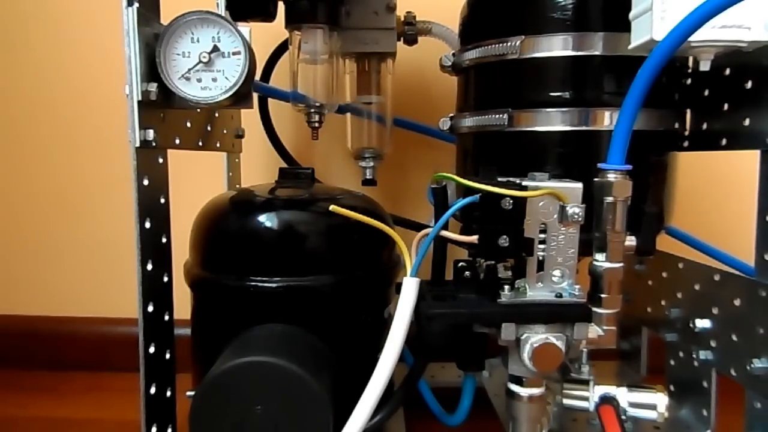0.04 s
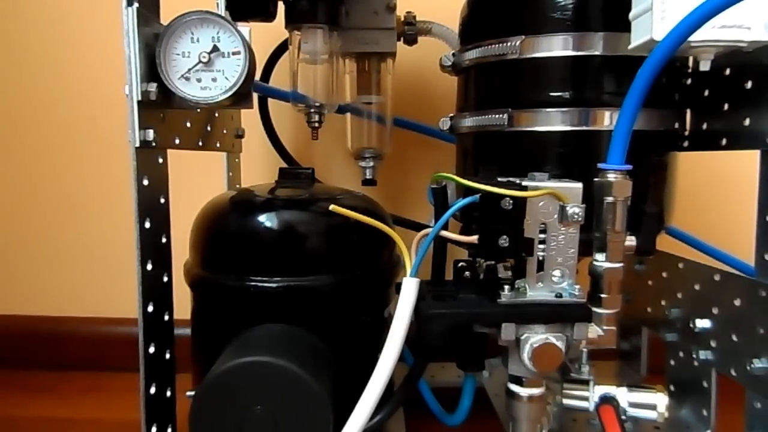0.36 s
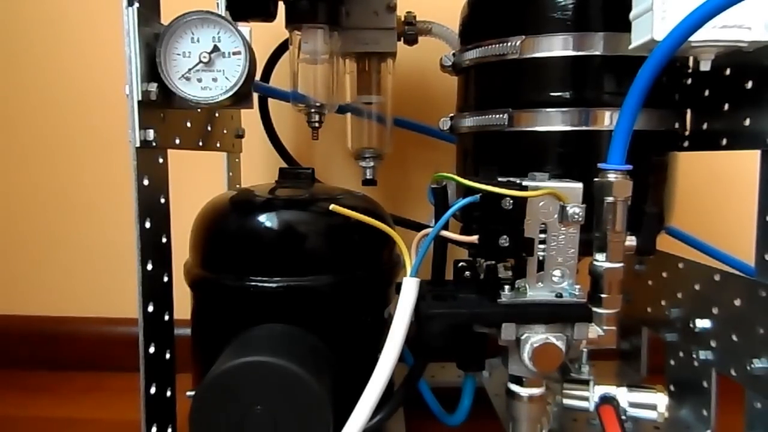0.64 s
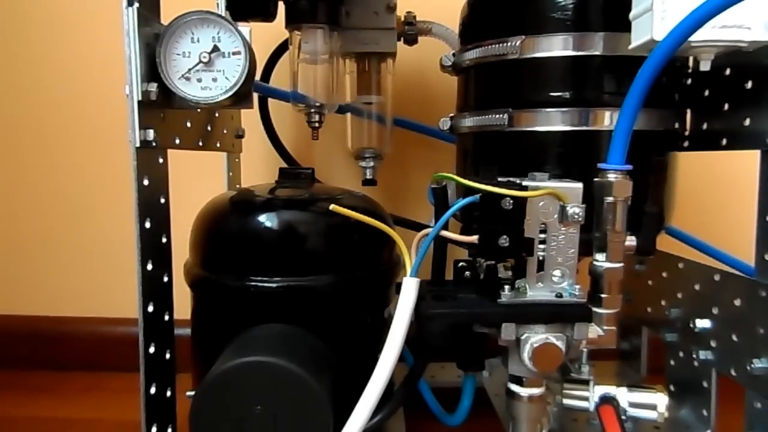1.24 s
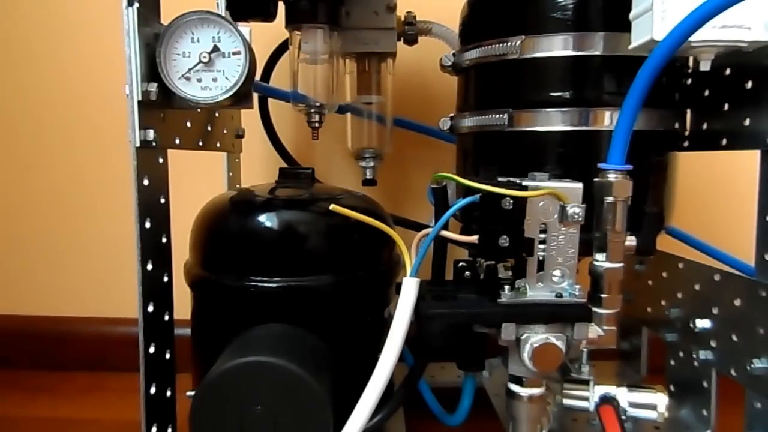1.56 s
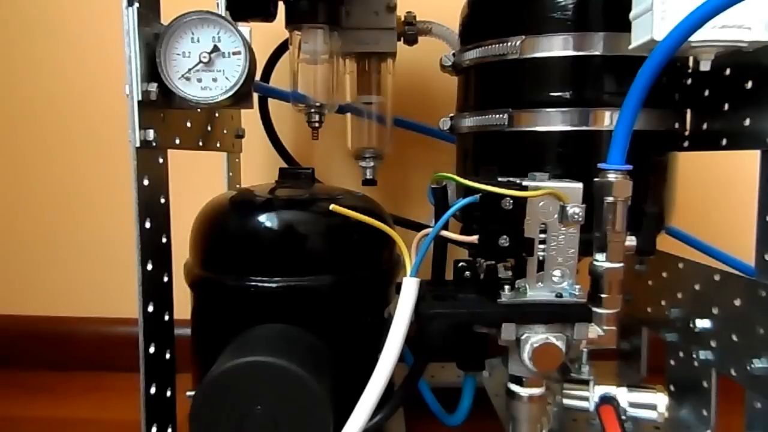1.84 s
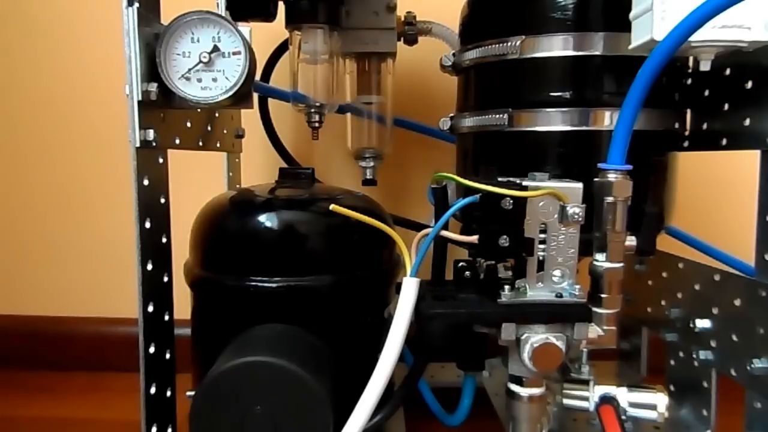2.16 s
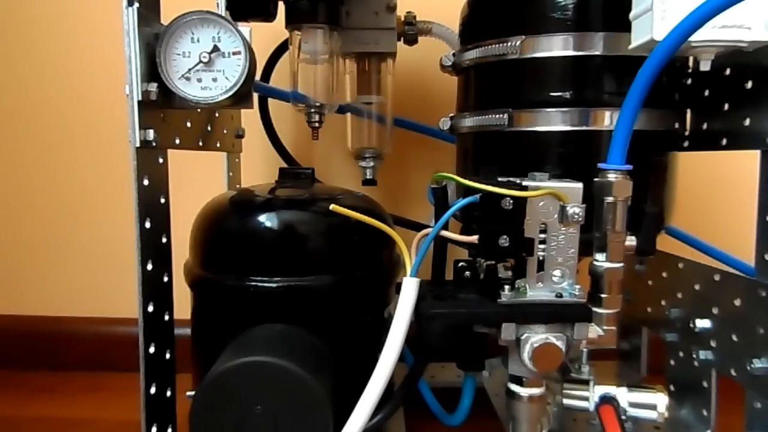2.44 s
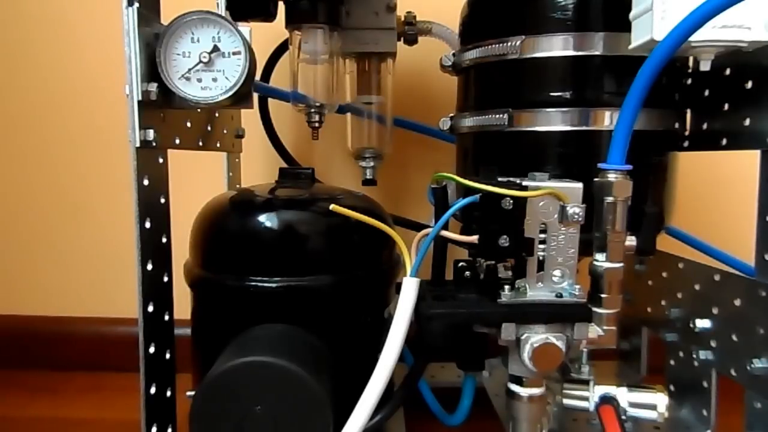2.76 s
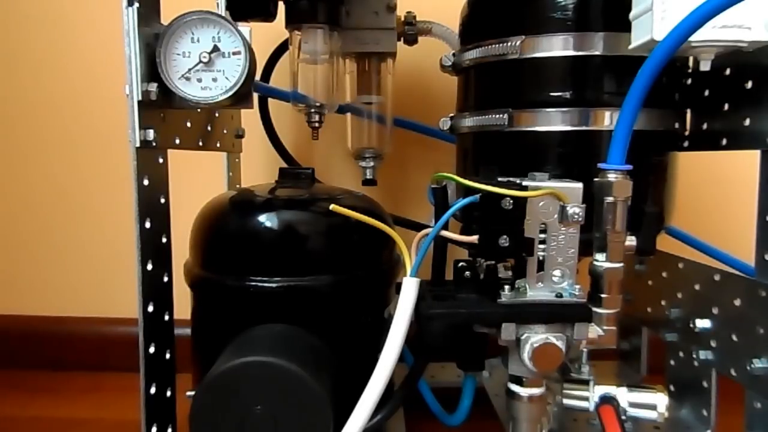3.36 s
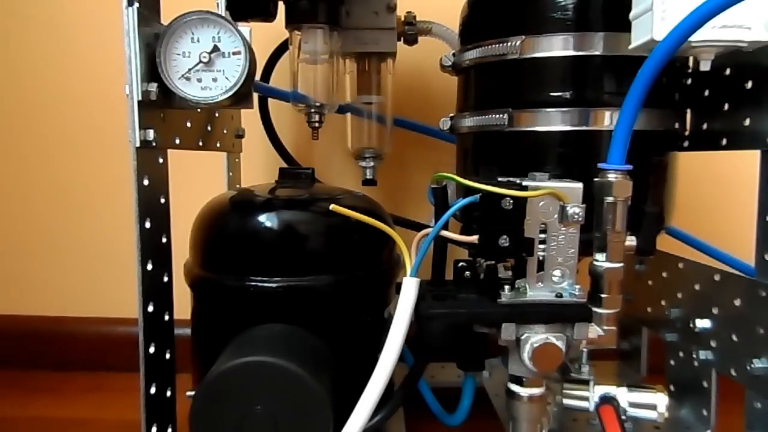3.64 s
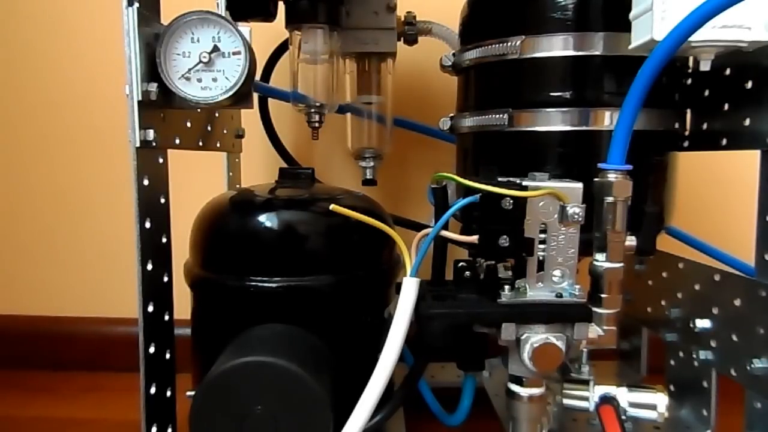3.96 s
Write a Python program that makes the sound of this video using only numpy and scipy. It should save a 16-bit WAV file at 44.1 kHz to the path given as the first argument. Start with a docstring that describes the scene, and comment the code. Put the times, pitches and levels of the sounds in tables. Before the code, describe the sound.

A small compressor clicks on and hums steadily while an air hiss grows louder.

```python
"""A small sealed piston compressor spins up in a quiet workshop, set off by the snap of a pressure switch.
The can jolts on its mounts and air spits from the start-up vent until it shuts with a dull pop.
The piston makes the can hum, and the valve's clack and gush ring the steel shell and pipes every stroke,
while a leak hisses louder and louder as the pressure builds."""
import sys
import numpy as np
from scipy import signal
from scipy.fft import rfft, irfft, next_fast_len
from scipy.io import wavfile

SR = 44100
rng = np.random.default_rng(int(sys.argv[2]) if len(sys.argv) > 2 else 0)


def to_wav(s):
    """Save 16-bit WAV."""
    ch = np.atleast_2d(s).T  # columns
    pcm = np.round(np.clip(ch, -1, 1) * 32767)  # PCM
    wavfile.write(sys.argv[1], SR, pcm.astype(np.int16))


N = 176400
RUN_S, SETTLED_S = 0.201, 0.222  # the first full turn starts; regular strokes begin


def amp(db):
    """Decibels to gain."""
    return 10 ** (np.asarray(db) / 20)


def unit(x):
    """Scale to rms 1."""
    return x / np.sqrt(np.mean(x ** 2) + 1e-20)


def clock():
    """Time of every sample in seconds."""
    return np.arange(N) / SR


def curve(rows):
    """Automation line through (t/s, value) points."""
    return np.interp(clock(), *np.transpose(rows))


def filtered(x, response):
    """Shape x with a frequency response."""
    size = next_fast_len(N + SR // 2)
    return irfft(rfft(x, size) * response(np.fft.rfftfreq(size, 1 / SR)), size)[:N]


def noise(spectrum):
    """Noise of rms 1, coloured by (f/Hz, level/dB) points of spectral density."""
    hz, db = np.transpose(spectrum)
    white = rng.standard_normal(N)
    return unit(filtered(white, lambda f: amp(np.interp(np.log(f + 1), np.log(hz + 1), db))))


def ring(x, modes):
    """Play x through (f/Hz, width/Hz, level/dB) resonances of alternating polarity."""
    return filtered(x, lambda f: sum((-1) ** k * amp(db) * 1j * f * width
                                     / (hz * hz - f * f + 1j * f * width)
                                     for k, (hz, width, db) in enumerate(modes)))


def decay(start, t60):
    """Instant attack, then a fall of 60 dB every t60 seconds."""
    age = clock() - start
    return (age >= 0) * np.exp(-np.log(1000) * np.abs(age) / t60)


def pulses(times, sizes):
    """Clicks placed between samples as windowed sincs."""
    at = np.asarray(times)[:, None] * SR
    index = np.floor(at).astype(int) + np.arange(-7, 9)
    clicks = np.sinc(index - at) * np.sinc((index - at) / 8) * np.asarray(sizes)[:, None]
    return np.bincount(np.clip(index, 0, N).ravel(), clicks.ravel(), N + 1)[:N]


def room_tone(level_db=-61.5):
    """The quiet room: a steady, dark bed of noise."""
    colour = [(20, -6), (80, -3), (200, -18.5), (600, -20.5), (2000, -30), (6000, -33), (15000, -35)]  # room spectrum: f/Hz, level/dB
    return amp(level_db) * noise(colour)


def workshop(x, t60=0.17, wet_db=-8):
    """Blend in short reflections from the frame and the wall."""
    tail = (decay(0, t60) * rng.standard_normal(N))[:SR // 2]
    wet = signal.fftconvolve(x, tail / np.linalg.norm(tail))[:N]
    return (x + amp(wet_db) * wet) / np.hypot(1, amp(wet_db))


def pressure_switch():
    """The contacts snap, rebound and leave their metalwork ringing."""
    hits = [(0.0645, -34.5), (0.0697, -49), (0.0776, -45)]  # snap and rebounds: t/s, level/dB
    colour = [(120, -42), (200, -17), (690, -10.5), (974, -16.5), (1560, -4), (2700, -7), (3890, -7),
              (5200, -9.5), (6130, -2.5), (6830, -6.5), (9830, -3.5), (11800, -8.5), (15500, -11)]  # snap spectrum: f/Hz, level/dB
    metal_modes = [(2300, -19, 0.28), (3801, -21, 0.16), (6062, -5, 0.15), (7600, -9, 0.15),
                   (8872, -3, 0.13), (9950, -14, 0.38), (9800, -7, 0.079), (11030, -3, 0.1)]  # ringing metalwork: f/Hz, level/dB, t60/s
    start, snap_db = hits[0]
    age = clock() - start
    cracks = sum(amp(db) * decay(at, t60=0.021) for at, db in hits) * noise(colour)
    tail = amp(snap_db - 8) * decay(start, t60=0.19) * noise(colour)
    metal = sum(amp(db) * decay(start, t60) * np.sin(2 * np.pi * hz * age) for hz, db, t60 in metal_modes)
    return cracks + tail + amp(snap_db - 17) * metal


def mount_jolts():
    """The can jerks on its mounts with low, ringing thuds."""
    jolts = [(.142, -54.5), (.179, -54)]  # jerks of the can: t/s, level/dB
    modes = [(235, -8.5, 0.19), (302, -5.5, 0.2), (365, -2.5, .15), (427, -4.5, .13), (528, -6, 0.091),
             (892, -4.5, 0.13), (990, -5, .12)]  # ring of the mounts: f/Hz, level/dB, t60/s
    return sum(amp(jolt_db + db) * decay(at, t60)
               * np.sin(2 * np.pi * hz * (clock() - at) + rng.normal(0, 1))
               for at, jolt_db in jolts for hz, db, t60 in modes)


def start_up_vent(shut_s=0.2818, pop_db=-45.5):
    """Air spits from the vent and dies away after it seats with a dull pop."""
    swell = [(.14, -77), (.147, -57), (.19, -49.5), (.24, -46.5), (.273, -45), (.281, -39), (.29, -49.5),
             (.33, -63), (.4, -89)]  # air envelope: t/s, level/dB
    air_colour = [(500, -23), (1000, -6.5), (1600, -15), (2300, -14), (3400, -6.5), (5200, -5),
                  (6150, -12.5), (6900, -6), (8000, -11.5), (9500, -8), (12000, -3.5), (13200, 0),
                  (14900, -3), (15600, -6)]  # air spectrum: f/Hz, level/dB
    pop_colour = [(200, -20), (480, -12), (620, 4), (850, -4), (1100, -18), (2000, -28), (6000, -45)]  # pop spectrum: f/Hz, level/dB
    blowing = (clock() > swell[0][0]) & (clock() < swell[-1][0])
    air = blowing * amp(curve(swell)) * noise(air_colour)
    pop = amp(pop_db) * decay(shut_s, t60=0.026) * noise(pop_colour)
    return air + pop


def leak(final_rush_db=-54, rush_growth=0.74):
    """Escaping air: a high hiss over a softer rush, both growing with pressure."""
    swell = [(.25, -63), (.45, -62.5), (.7, -61.5), (1.1, -56.5), (1.8, -50), (2.3, -46.5), (3, -44),
             (3.5, -42), (3.7, -41), (4, -41.5)]  # hiss envelope: t/s, level/dB
    hiss_colour = [(3000, -37), (4100, -17), (4400, -10.5), (6000, -12.5), (7400, -13.5), (7800, -11.5),
                   (8200, -11), (8600, -5.5), (9300, -1.5), (10000, -4), (10300, -6), (11000, -5.5),
                   (11400, -2.5), (11850, -3), (12050, -10), (12280, -2.5), (13400, 0.5), (14050, -3.5),
                   (14700, -8.5), (15700, -14)]  # bright top of the leak: f/Hz, level/dB
    rush_colour = [(150, 3), (300, -4.5), (600, -6.5), (1000, -4), (1700, -3), (2300, -3.5), (2700, 5.5),
                   (3000, 1), (3500, 5), (3900, -3), (4600, -31)]  # body of the leak: f/Hz, level/dB
    hiss_db = curve(swell)
    rush_db = final_rush_db + rush_growth * (hiss_db - swell[-1][1])
    rush = amp(rush_db) * noise(rush_colour)
    hiss = amp(hiss_db) * noise(hiss_colour)
    return (clock() > swell[0][0]) * (hiss + rush)


def shaft_turns():
    """Turns of the motor shaft, counted from RUN_S."""
    speed = [(.2, 48.3), (.33, 48.8), (.47, 49.45), (.65, 49.18), (1.2, 49.1), (2.5, 49.03), (4, 49.0)]  # shaft speed: t/s, f/Hz
    turns = np.cumsum(curve(speed)) / SR
    return turns - np.interp(RUN_S, clock(), turns)


def valve(turns, opens_turn=0.17, gush_turns=0.54, jitter_s=8e-6, scatter_db=0.5):
    """Each stroke's clack and rough gush of gas ring the can, its shell and the pipes."""
    first_strokes = [(.142, -4.5), (0.179, 3), (0.204, 2.5), (0.207, 0), (.246, 5)]  # hard knocks of the spin-up: t/s, level/dB
    can_modes = [(1038.5, 17.3, 0)]  # lowest ring of the can: f/Hz, width/Hz, level/dB
    shell_modes = [(2460, 47, -16), (2695, 65, -1), (2736.6, 46.5, 0.5), (3283, 51, -11), (3349, 44, -14),
                   (3610, 100, -30)]  # steel shell: f/Hz, width/Hz, level/dB
    rattle_modes = [(2120, 41, 0)]  # ring that fades as the can settles: f/Hz, width/Hz, level/dB
    pipe_modes = [(5650, 21, 0), (7370, 130, -8), (8510, 28, -4.5), (8900, 70, -13), (9930, 34, 2.5),
                  (10400, 70, -3), (11330, 170, -5.5), (12800, 300, -14), (13300, 300, -10),
                  (15200, 450, -11)]  # bright ring of the pipes: f/Hz, width/Hz, level/dB
    can_fader = [(.24, -63), (.33, -64), (.41, -66.5), (.46, -62), (.5, -62), (.54, -65), (.64, -66),
                 (1.7, -65.5), (4, -65)]  # can envelope: t/s, level/dB
    shell_fader = [(.24, -60), (.3, -62), (.5, -65.5), (.7, -60.5), (1.1, -57), (1.7, -58.5), (2.1, -63),
                   (3, -64), (4, -64.5)]  # shell envelope: t/s, level/dB
    t = clock()
    strokes = np.interp(np.arange(int(turns[-1])) + opens_turn, turns, t)
    strokes = strokes[strokes > SETTLED_S]
    timing, force = rng.standard_normal((len(strokes), 2)).T
    clacks = unit(pulses(strokes + jitter_s * timing, amp(scatter_db * force)))
    gush_envelope = np.exp(-((turns - opens_turn) % 1) / gush_turns) * (t > SETTLED_S)
    gush = unit(gush_envelope * rng.standard_normal(N))
    drive = clacks + 0.13 * gush

    # The knocks are scaled against the shell's ring under even strokes.
    knock_s, knock_db = np.transpose(first_strokes)
    even_ring = ring(pulses(strokes, np.ones(len(strokes))), shell_modes)
    knocks = amp(-58) * ring(pulses(knock_s, amp(knock_db)), shell_modes) / np.std(even_ring)
    can = amp(curve(can_fader)) * unit(ring(drive, can_modes))
    shell = amp(curve(shell_fader)) * unit(ring(drive, shell_modes))
    rattle = amp(-67.5 - 9.5 * t) * unit(ring(drive, rattle_modes))  # fades 9.5 dB a second
    pipes = amp(-63.5) * unit(ring(clacks + 1.5 * gush, pipe_modes))  # more gush than clack
    return knocks + can + shell + rattle + pipes


def piston(turns, rise_s=0.0147, churn_db=-65.5):
    """The piston shakes the can once a turn; gas churns inside in step."""
    hum_levels = [-49, -49, -69.5]  # hum at shaft orders 1, 2, 3: level/dB
    buzz_partials = [(4, -83), (5, -83), (6, -73), (7, -80), (8, -78), (9, -81), (10, -71), (11, -73),
                     (12, -75), (13, -83), (14, -85), (16, -84), (27, -83)]  # buzz above the hum: shaft order, level/dB
    gas_colour = [(20, 13.5), (70, 6), (150, 1), (300, -1.5), (550, -2.5), (900, -12), (1600, -20),
                  (2700, -3), (3400, -4.5), (4200, -13.5), (8000, -5), (15000, -22)]  # gas inside the can: f/Hz, level/dB
    fade_in = np.clip((clock() - RUN_S) / rise_s + 1.42, 0, 1)
    hum = -sum(amp(db) * np.cos(2 * np.pi * order * turns) for order, db in enumerate(hum_levels, 1))
    buzz = sum(amp(db) * np.cos(2 * np.pi * order * (turns - 0.3) + rng.normal(0, 0.91))
               for order, db in buzz_partials)
    throb = 1 + 0.17 * np.cos(2 * np.pi * (turns - 0.35))
    churn = amp(churn_db) * noise(gas_colour) * throb
    return fade_in * (np.sqrt(2) * (hum + buzz) + churn)


def scene():
    """Mono mix of spin-up, running pump and room tone, with reflections on the leak alone."""
    turns = shaft_turns()
    spin_up = pressure_switch() + mount_jolts() + start_up_vent()
    pump = piston(turns) + valve(turns)
    return (spin_up + pump + workshop(leak()) + room_tone())[None]


def record(dry):
    """A brick-wall low-pass trims the very top."""
    return np.array([filtered(x, lambda hz: hz < 15800) for x in dry])


dry = scene()
out = record(dry)
to_wav(out)
```